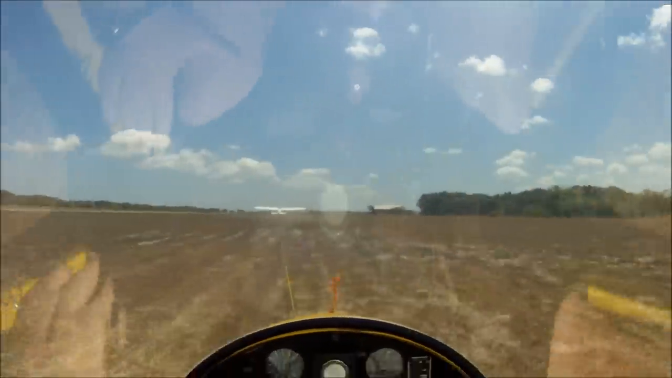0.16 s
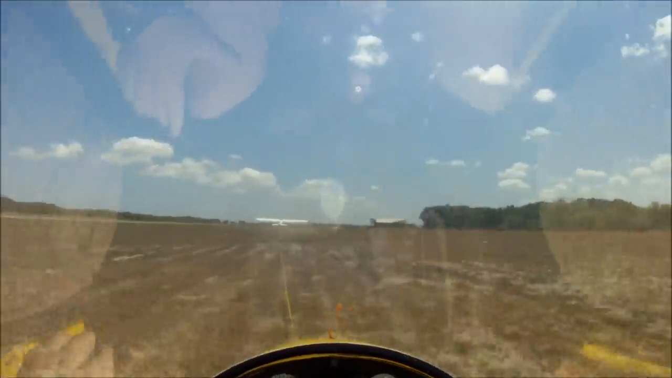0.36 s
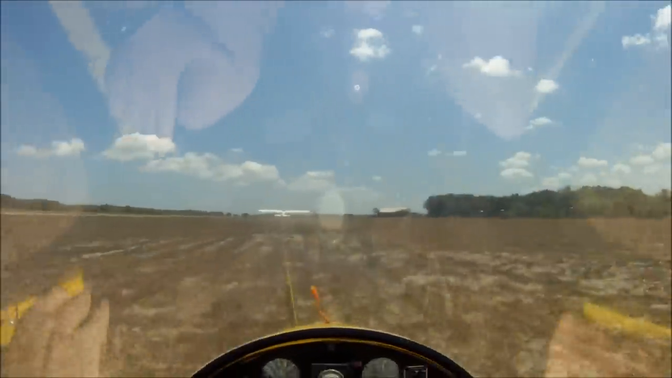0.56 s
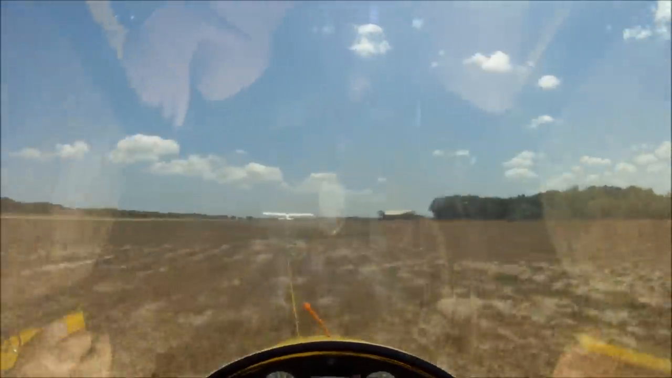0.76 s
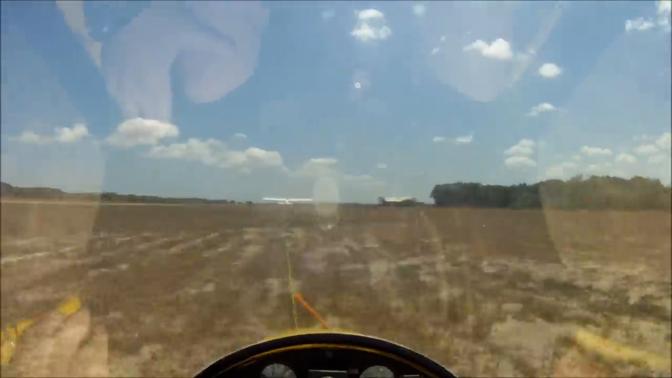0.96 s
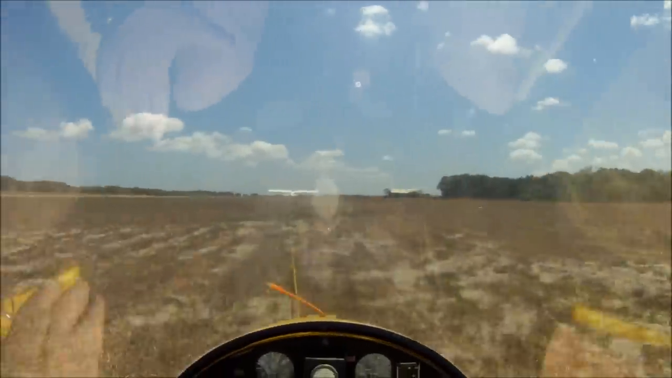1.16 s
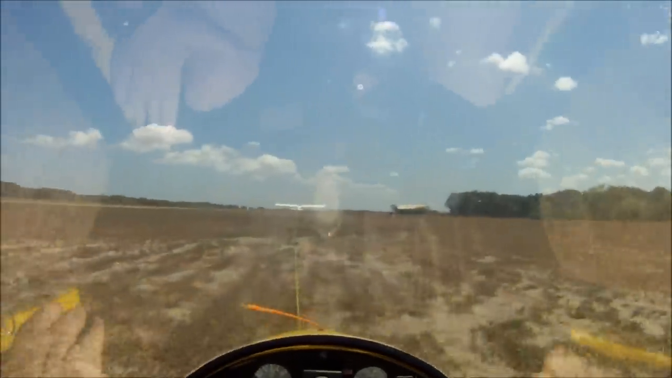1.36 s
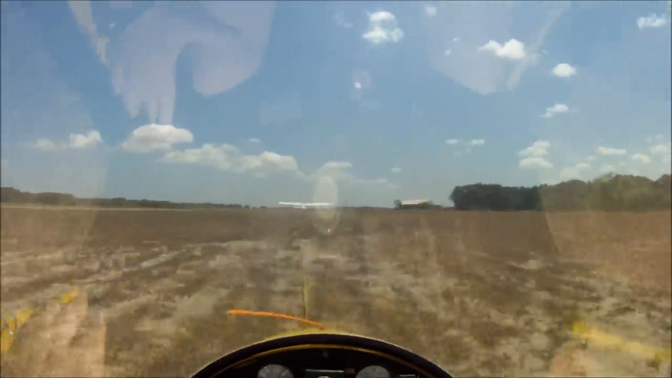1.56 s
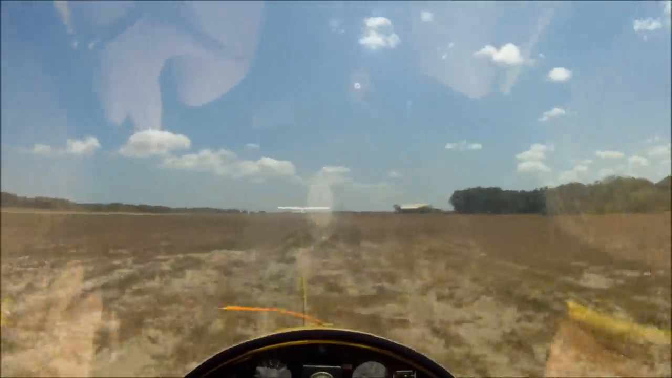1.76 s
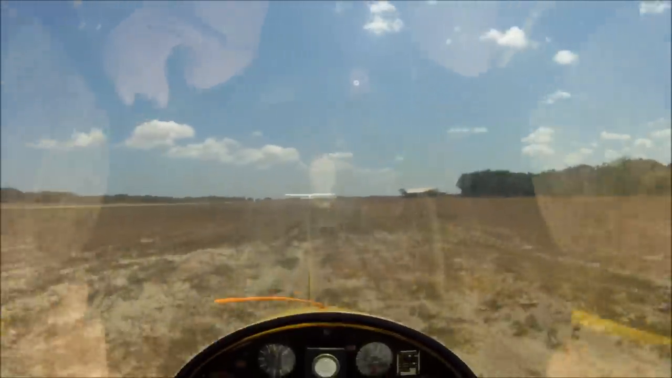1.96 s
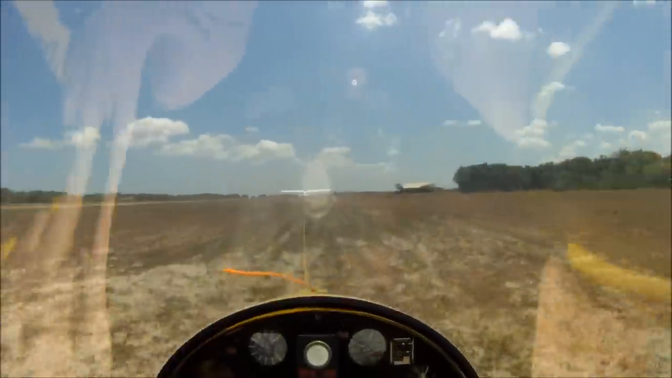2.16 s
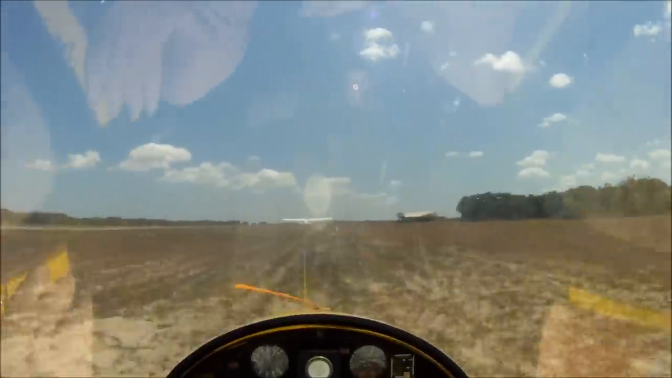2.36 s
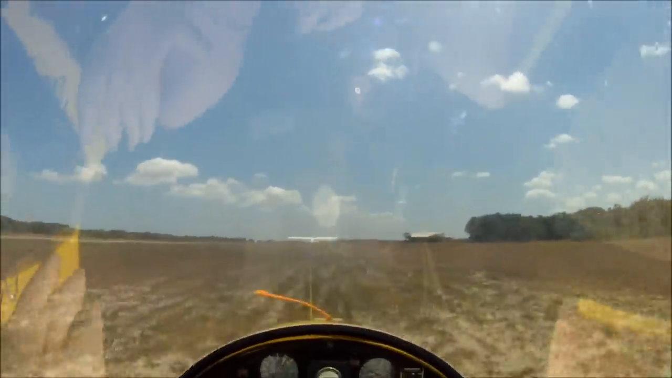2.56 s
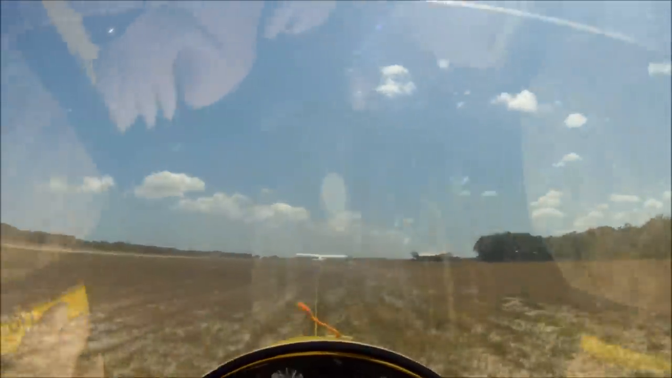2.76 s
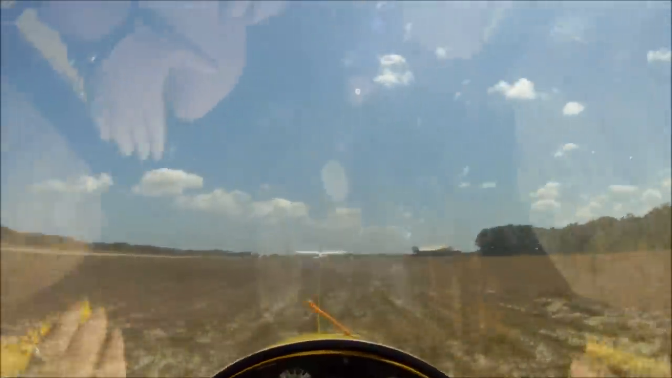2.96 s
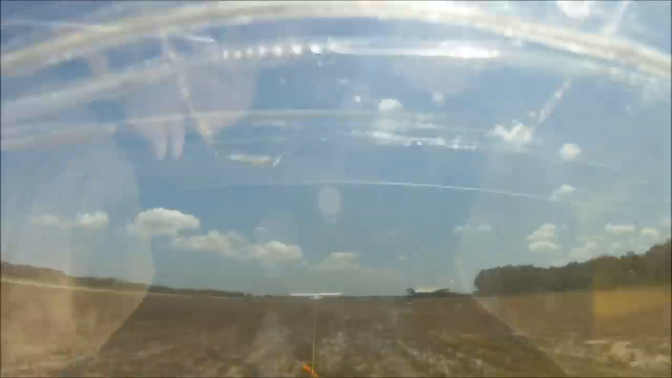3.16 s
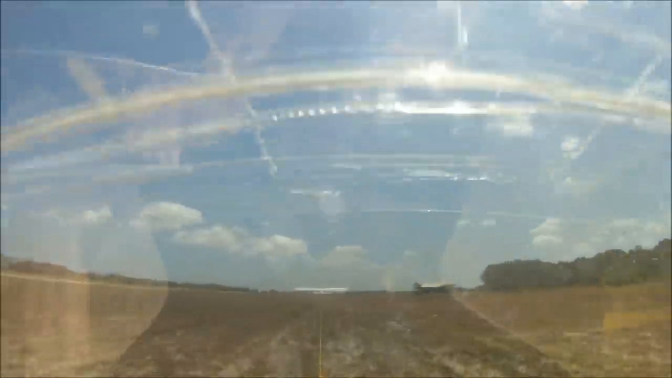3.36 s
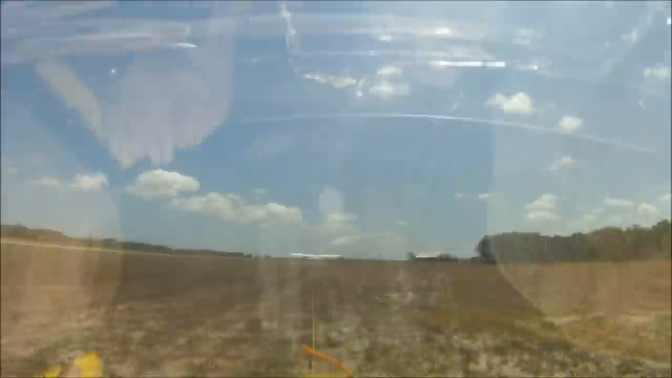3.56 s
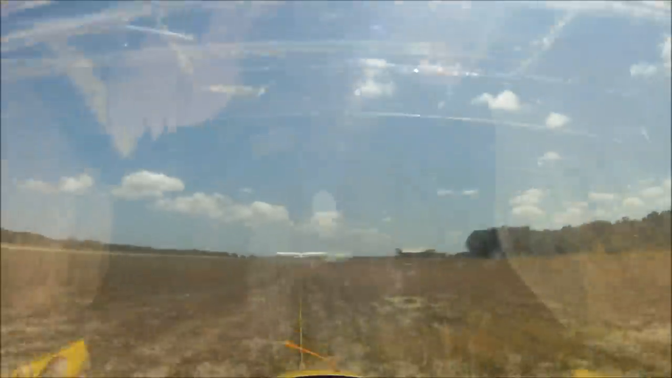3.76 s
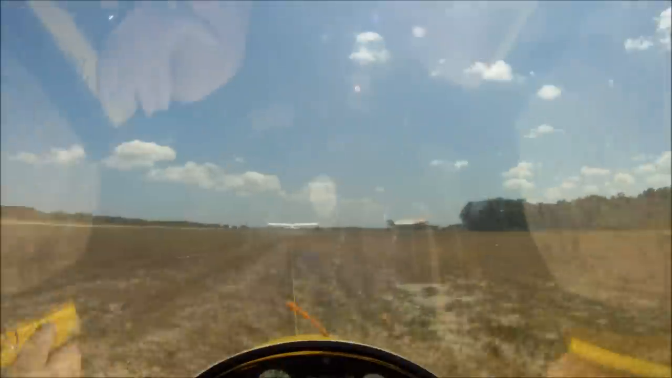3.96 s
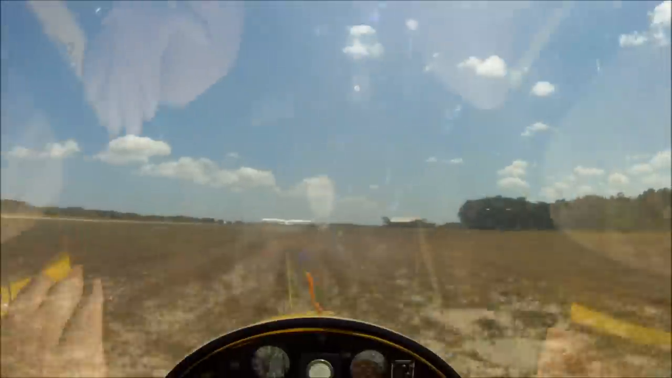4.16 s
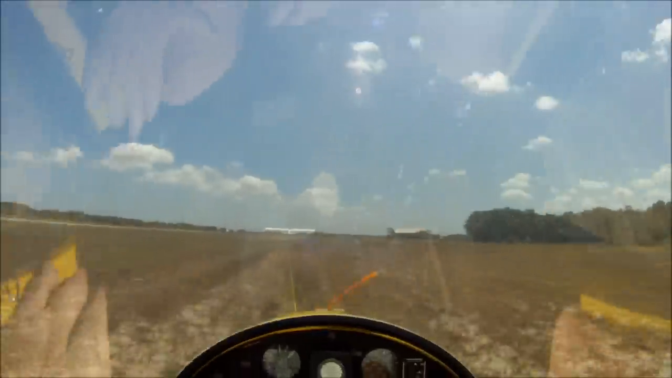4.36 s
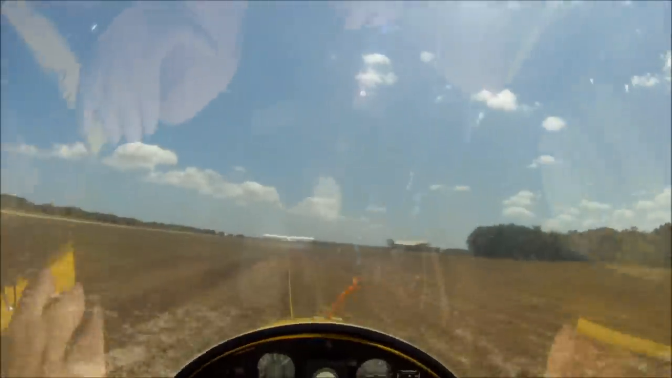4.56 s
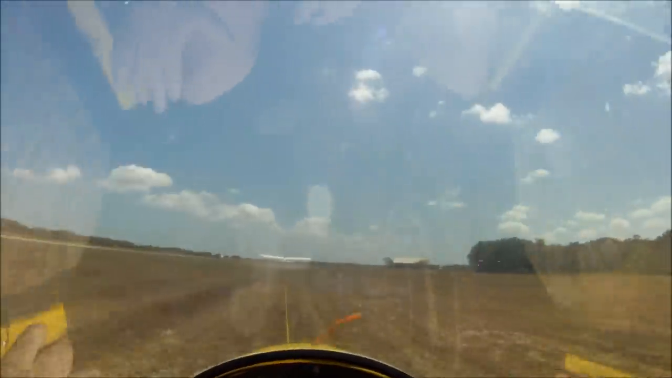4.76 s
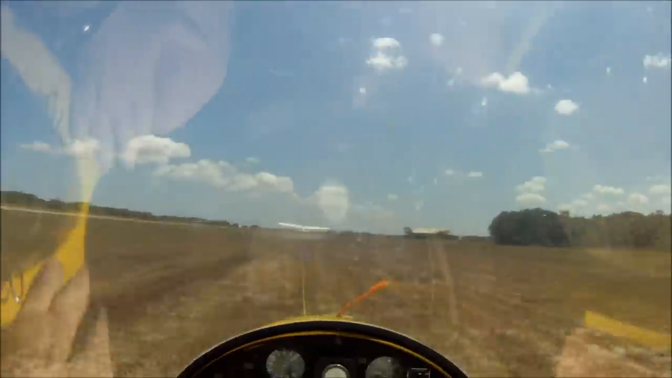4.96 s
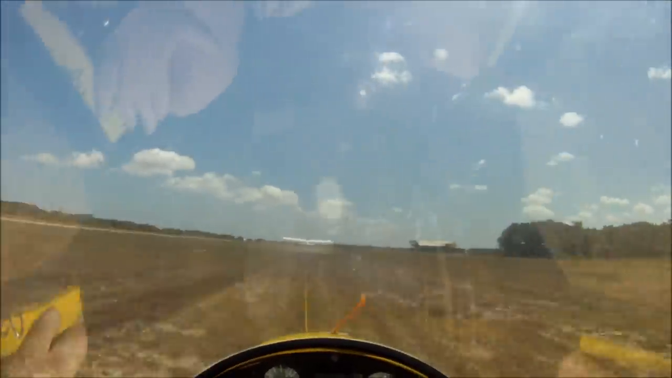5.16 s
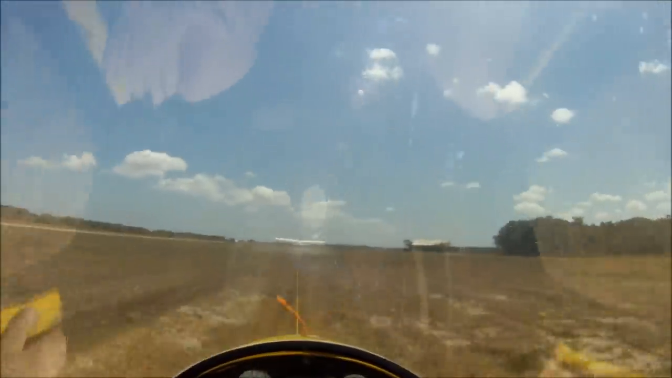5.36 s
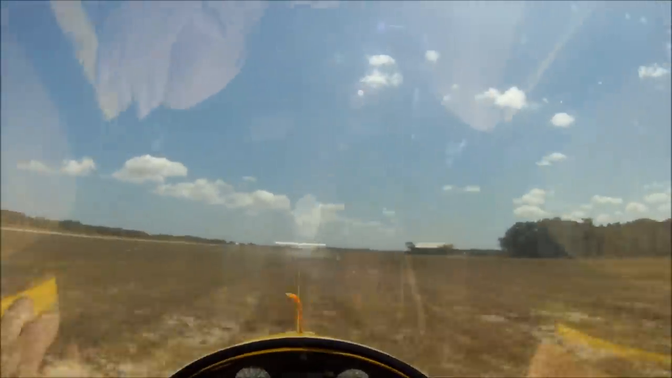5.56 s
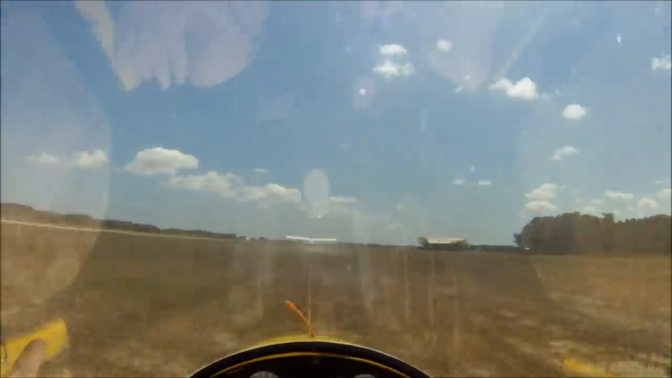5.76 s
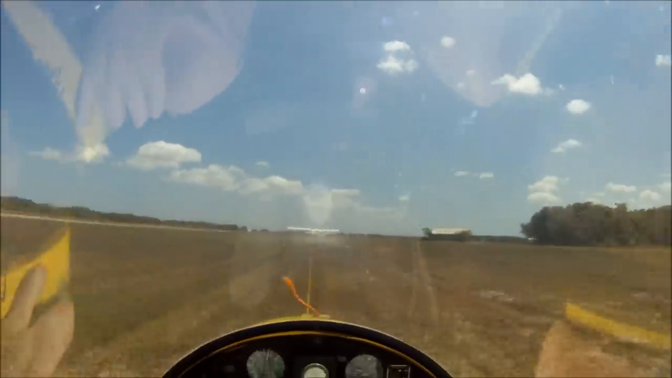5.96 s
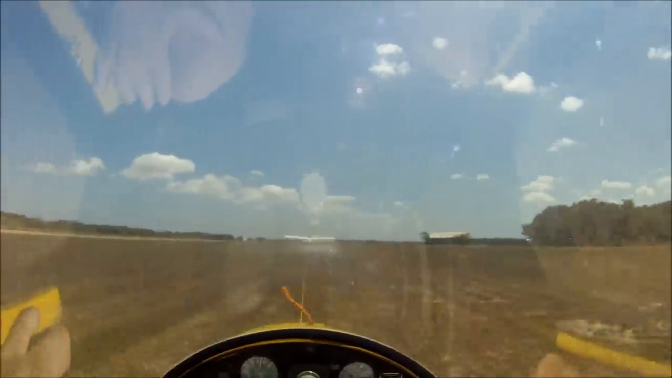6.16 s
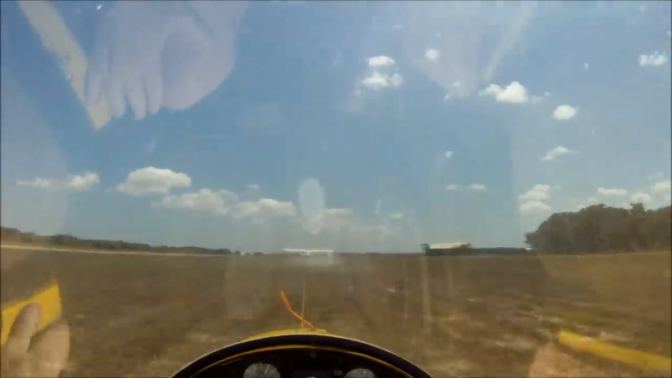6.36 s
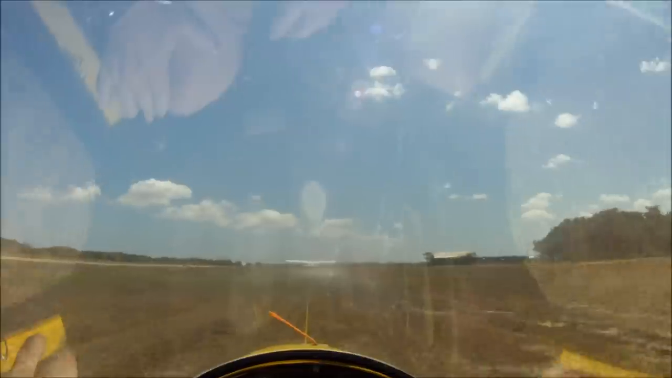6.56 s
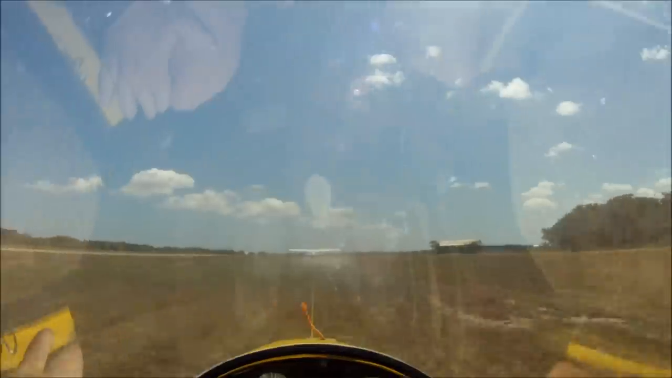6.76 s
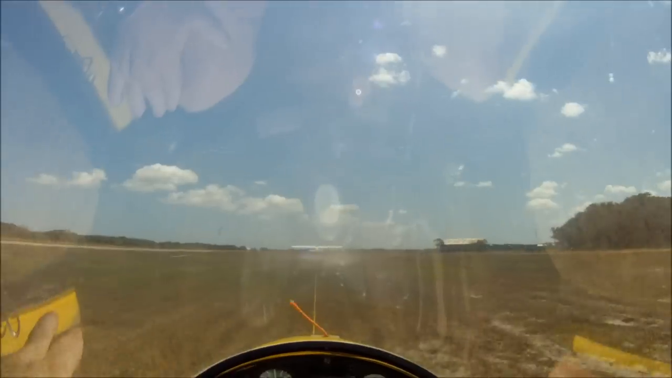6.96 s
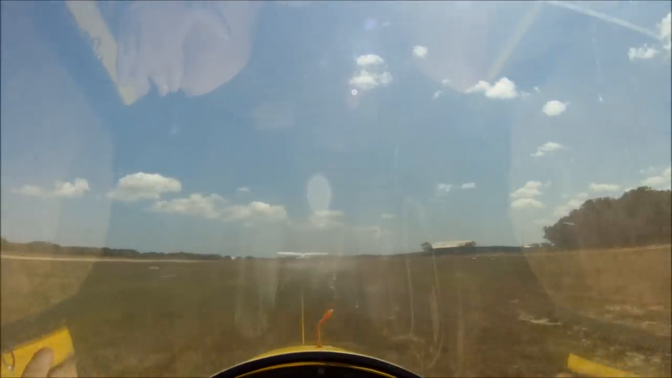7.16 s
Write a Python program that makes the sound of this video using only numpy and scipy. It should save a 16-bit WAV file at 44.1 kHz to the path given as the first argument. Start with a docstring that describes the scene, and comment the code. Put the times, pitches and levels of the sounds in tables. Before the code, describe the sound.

A glider cockpit during a ground tow over rough grass, heard through a cheap microphone mounted inside. A low, uneven wheel rumble and hollow fuselage boom run throughout, with a faint gusty air rush slowly growing. At 0.24 seconds a sharp, buzzing knock overloads the microphone, with a heavy thump. Small gritty rattles and scattered dry ticks follow. From about 1.75 seconds the bumps get rougher; plastic rattling comes in dense bursts, harshest and most grating between 2.9 and 3.5. At 3.9 a second loud, distorted knock hits with a deeper push, then a brief dip around 4.0. Thumps and rattles continue to about 4.8, followed by a calmer stretch of rumble and ticks. More bumps rattle at 5.97 and 6.4-6.8 as the boom and air keep building until the end. The tone is narrow and muffled, with a thin fizzy treble.

```python
"""A rumbling wheel, a hollow boom and rushing air: a glider under tow on rough grass, heard in the cockpit.
Shaped noise makes these three; decaying sines add low thumps, from the wheel in ruts and under the mount's
knocks. Bumps shake gritty rattle from the plastic microphone housing as dense tiny impacts; loose fittings tick
as scuffed noise pulses. The camera mount knocks as a buzz of sines, twice hard enough to overload the input. A
cheap recorder narrows the band and holds each slow sample, adding a thin, fizzy treble."""
import sys
import numpy as np
from scipy import signal
from scipy.fft import rfft, irfft
from scipy.io import wavfile

SR = 44100
rng = np.random.default_rng(int(sys.argv[2]) if len(sys.argv) > 2 else 0)


def file_out(sig):
    """Save sig as 16-bit WAV at sys.argv[1]."""
    # one column per channel
    cols = np.atleast_2d(sig).T
    # limit, then scale
    lim = np.clip(cols, -1, 1)
    pcm = np.round(lim * 32767).astype(np.int16)
    wavfile.write(sys.argv[1], SR, pcm)


N = 321822
TAPS = 4096
TIME_S = np.arange(N) / SR
BIN_HZ = np.fft.rfftfreq(TAPS, 1 / SR)
CLOCK_HZ, EDGE_HZ = 12000, 15450  # recorder sample clock, top of its output band

# Wheel and fuselage level laws, before trim:
# (start level [dB], growth with speed [dB/s], share of shaking [dB/dB], random swell rms [dB])
RUMBLE_LAW = (-33, 0.63, 0.37, .5)
BOOM_LAW = (-38, 0.6946, .2, 0.77)
# Brief swells and dips in rumble and boom: (time [s], half length [s], rumble change [dB], boom change [dB])
SWELLS = [(.04, 0.027, 4.5, 7.5), (1.93, .1, -2, 3.5), (2.45, .15, 3, -0.5), (4.095, .04, 0, 4),
          (4.5, .12, 0.5, 2.5), (4.98, .03, -5, 5), (6.094, 0.016, 0, 9), (6.33, 0.038, 0, 8),
          (6.67, 0.072, 1.5, 4), (7.18, 0.067, 3, 0)]
# Brief lulls in the din, each layer taking its share: (time [s], half length [s], full depth [dB])
LULLS = [(0.303, .04, 4.5), (0.716, 0.027, 5), (0.857, 0.033, 2.5), (2.666, 0.019, 7.5), (2.92, 0.029, 3),
         (4.006, 0.027, 17), (4.702, 0.028, 5), (4.927, .04, 4.5), (6.018, 0.016, 11), (6.462, .025, 6.5)]
# Rolling wheel spectrum: (frequency [Hz], relative density [dB per Hz])
RUMBLE_SPECTRUM = [(10, -10.5), (22, 4.5), (32, 0), (46, -1), (62, -4), (100, -7.5), (125, -7),
                   (150, -21.5), (250, -20.5), (400, -30.5), (900, -53)]
# Low thumps, from the wheel dropping into ruts and under the mount knocks: (time [s], level [dB], pitch [Hz],
# swell time [s])
THUMPS = [(0.241, -21, 50, 0.0072), (0.2439, -5.5, 147, 0.0014), (1.599, -19.5, 41, 0.0097),
          (1.955, -19, 70, 0.0069), (2.054, -21.5, 65, 0.009), (3.186, -18, 79.4, 0.0063),
          (3.25, -17.5, 59, 0.01), (3.898, -11, 107, 0.0047), (3.968, -14.5, 42.3, 0.009),
          (4.307, -13, 42, .012), (4.375, -23, 30, 0.031), (4.721, -18.5, 33, 0.024),
          (4.73, -17.5, 84, 0.01), (5.8, -23, 33, 0.016), (6.19, -19.5, 60, 0.0067),
          (6.656, -21, 121, 0.017)]
# Fuselage air modes: (frequency [Hz], width [Hz], relative level [dB])
CABIN_MODES = [(134.4, 15.5, -3.5), (178.4, 22, 2), (200.3, 11, 1.5), (227, 18.5, -1.5),
               (289.4, 20.6, -9.5)]
# Airflow spectrum: (frequency [Hz], relative density [dB per Hz])
AIR_SPECTRUM = [(100, 1.5), (280, -10.5), (450, -8), (800, -9), (1500, -16), (2200, -6.5), (3000, -18.5),
                (4500, -26), (6000, -42)]
# Cockpit shaking between bumps: (time [s], rattle drive [dB])
SHAKE = [(0, -48), (.45, -43), (.89, -44), (1.05, -41), (1.45, -42), (1.62, -38.5), (2, -34.5),
         (2.45, -36.5), (2.62, -38.5), (3.08, -35), (3.4, -28.5), (3.68, -40), (4.2, -36), (5.1, -42.5),
         (5.45, -42.5), (5.63, -35.5), (6.15, -42), (6.68, -38.5), (7.04, -44), (7.3, -36.5)]
USUAL_SHAKE_DB = -40.5  # on average turf
# Bumps that set off rattle bursts: (time [s], drive level [dB], fade time [s], hard/soft ratio [dB])
JOLTS = [(.036, -30, 0.018, -25), (0.368, -29.5, 0.02, -25), (.565, -33, 0.035, -25),
         (.615, -30.5, 0.039, -14), (.78, -27, 0.015, -27), (1.006, -37, 0.071, -19),
         (1.109, -35, 0.088, -15), (1.764, -22, 0.016, -5.5), (1.821, -30, 0.038, -10),
         (1.953, -20.5, 0.02, -12), (1.993, -25, 0.019, -6), (2.206, -25, .008, -5),
         (2.33, -26, 0.014, -20), (2.358, -27, 0.059, -17), (2.41, -27.5, 0.1, -17),
         (2.688, -35, 0.048, -25), (2.952, -18, 0.022, -8), (3.058, -24, 0.016, -20),
         (3.188, -21.5, 0.039, -7), (3.308, -19.5, 0.027, -7), (3.374, -24.5, 0.018, 1),
         (3.436, -25.5, 0.019, 2), (3.703, -31.5, 0.027, -1.5), (4.042, -31, .01, -13),
         (4.077, -22.5, 0.036, -6), (4.374, -27, 0.1, -20), (4.425, -26.5, 0.043, -3.5),
         (4.527, -32, 0.034, -23), (4.574, -27, .026, -28.5), (4.618, -20, 0.0099, -27),
         (4.746, -28, .11, -17), (4.791, -23, 0.0099, -19), (5.272, -26.5, .037, -28),
         (5.433, -29, 0.015, -28), (5.971, -25, .028, -21), (6.381, -32, 0.048, -20),
         (6.485, -25, 0.041, -8), (6.538, -30.5, 0.019, -21), (6.677, -24.5, 0.033, -22),
         (6.734, -30.5, 0.093, -15)]
# Steady shaking: drive at which half grates [dB], growth of hard/soft ratio [dB/dB]
GRATE_FROM_DB, GRATE_PER_DB = -17, .9
# Housing resonances: (frequency [Hz], width [Hz], relative level [dB])
HOUSING_MODES = [(463, 30, -2.5), (617, 28, -4.5), (854, 81, -11), (1203, 187, -7), (1743, 240, -7),
                 (2097, 190, 1), (2297, 214, -0.5), (2730, 25, -15.5), (3302, 78, -10), (3705, 205, -11),
                 (4800, 120, -21)]
# Housing transmission between resonances: (frequency [Hz], relative gain [dB])
WALL_GAIN = [(60, -9), (300, -6), (900, -13.5), (1450, -19), (2600, -14.5), (3500, -20), (4200, -27),
             (5300, -21), (6000, -29.5)]
# Housing weighting under hard, grating contact: (frequency [Hz], relative gain [dB])
GRATE_GAIN = [(150, 1), (600, -15), (1700, 4), (2200, -4), (2800, 13.5), (3800, 9), (5500, 6.5)]
# Loudest ticks of loose fittings: (time [s], level before tick gain [dB])
TICKS = [(.043, -32.5), (.111, -33), (.12, -39), (.298, -40), (.429, -35.5), (.507, -38.5), (.942, -38),
         (1.121, -29.5), (1.188, -28.5), (1.294, -36), (1.372, -33), (1.535, -35), (1.545, -32.5),
         (1.604, -34.5), (1.758, -26.5), (1.904, -33), (2.092, -31), (2.21, -33), (2.278, -35), (2.36, -31),
         (2.703, -37), (2.921, -38), (3.127, -31.5), (3.561, -32.5), (3.612, -29), (3.621, -32),
         (3.706, -35), (3.774, -34.5), (4.146, -32), (4.646, -31), (4.777, -33), (4.858, -29),
         (4.867, -28.5), (4.919, -31.5), (5.222, -34), (5.523, -37), (5.878, -29.5), (5.929, -33.5),
         (6.011, -32), (6.418, -31.5), (7.175, -35.5)]
# Tick spectrum: (frequency [Hz], relative density [dB per Hz])
TICK_SPECTRUM = [(200, -17), (1400, -1), (2200, 9), (2800, -2), (3400, 6.5), (5200, 7), (6000, -2)]
# Faint ticks weaken as the wings take the weight
PATTER_START_DB, PATTER_DB_PER_S = -53, -1.5
# Mount knocks and rebounds: (time [s], level [dB], length [s], push/buzz ratio [dB])
KNOCKS = [(0.2411, 6.5, 0.0044, -15), (.258, -33, 0.0033, -4), (3.895, 8, 0.0047, 3),
          (3.905, -20, 0.0032, -10), (3.968, -25.5, 0.0028, -8)]
# Mount modes: (frequency [Hz], relative level [dB])
MOUNT_MODES = [(340, -11), (620, -10), (800, -10), (1020, -7), (1270, -1), (1520, -6.5), (1770, 1),
               (2050, 2.5), (2300, -11), (2600, 1.5), (2900, -35), (3200, -4.5), (3620, -1.5), (4200, -15),
               (4850, -8.5)]


def amp(db):
    """Converts decibels to amplitude gain."""
    return 10 ** (np.asarray(db) / 20)


def evened(x):
    """Scales a signal to unit rms."""
    return x / np.sqrt(np.mean(x ** 2) + 1e-20)


def slope(points):
    """Gain per bin, interpolated in dB on a log-frequency axis."""
    hz, db = np.transpose(points)
    return amp(np.interp(np.log(BIN_HZ + 1), np.log(hz), db))


def peaks(modes):
    """Gain per bin of resonances summed in power."""
    power = 0
    for hz, width_hz, db in modes:
        gain = amp(db) / (1 + ((BIN_HZ - hz) / width_hz) ** 2 * 2)
        power = power + gain ** 2
    return np.sqrt(power)


def ring(gain):
    """Minimum-phase, unit-energy impulse response of a gain curve."""
    cepstrum = irfft(np.log(np.maximum(gain / gain.max(), 1e-5)))
    # folding the cepstrum onto positive time makes the response causal
    cepstrum[1:TAPS // 2] *= 2
    cepstrum[TAPS // 2 + 1:] = 0
    response = irfft(np.exp(rfft(cepstrum)))
    return response / np.linalg.norm(response)


def through(force, gain):
    """Filters a force through a body's response."""
    return signal.oaconvolve(force, ring(gain))[:N]


def flutter(rate_hz):
    """Smooth unit-rms random curve, low-passed near the given rate."""
    hz = np.fft.rfftfreq(N, 1 / SR)
    spectrum = rfft(rng.standard_normal(N))
    return evened(irfft(spectrum / (1 + (hz / rate_hz) ** 4), N))


def add(mix, start_s, sound):
    """Adds a sound into the mix in place."""
    part = mix[max(round(start_s * SR), 0):][:len(sound)]
    part += sound[:len(part)]


def bells(times_s, half_lengths_s, heights_db):
    """Sum of bell-shaped level changes, in dB over time."""
    total_db = 0
    for s, half_s, db in zip(times_s, half_lengths_s, heights_db):
        total_db = total_db + db * np.exp(-((TIME_S - s) / half_s) ** 2)
    return total_db


def rolling(law, shake_db, swell_hz=7):
    """Level in dB: a steady climb for speed, a share of the shaking and a random swell."""
    start_db, db_per_s, share, swell_db = law
    shaking_db = share * (shake_db - USUAL_SHAKE_DB)
    return start_db + db_per_s * TIME_S + shaking_db + swell_db * flutter(swell_hz)


def wheel(level_db, trim_db=-1):
    """Uneven turf shakes the airframe as low noise; heavy decaying sines add low thumps, from ruts and under
    the knocks."""
    noise = evened(through(rng.standard_normal(N), slope(RUMBLE_SPECTRUM)))
    out = amp(level_db + trim_db) * noise
    t = TIME_S[:SR // 3]
    for s, db, hz, swell_s in THUMPS:
        envelope = t / swell_s * np.exp(1 - t / swell_s)
        add(out, s, amp(db) * envelope * np.sin(2 * np.pi * hz * t))
    return out


def fuselage(level_db, trim_db=-1):
    """Noise rings the air modes of the hollow shell as a boom."""
    boom = evened(through(rng.standard_normal(N), peaks(CABIN_MODES)))
    return amp(level_db + trim_db) * boom


def airflow(start_db=-52, end_db=-44, gust_db=3.5, gust_hz=7.2):
    """Air rushing over the canopy: gusty shaped noise, growing with speed."""
    climb_db = (end_db - start_db) * TIME_S / TIME_S[-1]
    level_db = start_db + climb_db + gust_db * flutter(gust_hz)
    return amp(level_db) * evened(through(rng.standard_normal(N), slope(AIR_SPECTRUM)))


def grit(level_db, grains_per_s=3500, spread_db=0.5, flutter_db=1.14, flutter_hz=45):
    """Dense train of tiny impacts, random in time, sign and size, with flickering strength."""
    sizes = amp(spread_db * np.minimum(rng.exponential(1, N), 3)) * rng.choice([-1, 1], N)
    hits = rng.random(N) < grains_per_s / SR
    return amp(level_db) * evened(sizes * hits * amp(flutter_db * flutter(flutter_hz)))


def rattle(housing, shake_db, uneven_db=1.5, uneven_hz=22, grate_db=2, rise_s=0.0023):
    """Tiny impacts ring the housing; bumps add dying bursts, and hard contact grates."""
    power = amp(shake_db + uneven_db * flutter(uneven_hz)) ** 2
    hardness = (power / amp(GRATE_FROM_DB) ** 2) ** GRATE_PER_DB  # hard/soft power ratio
    soft_power = power / (1 + hardness)
    hard_power = power * hardness / (1 + hardness)
    t = TIME_S[:SR // 2]
    for s, db, fade_s, hard_db in JOLTS:
        envelope = np.minimum(t / rise_s, 1) * np.exp(-t / max(fade_s, .004))
        burst_power = (amp(db) * envelope) ** 2
        add(soft_power, s, burst_power / (1 + amp(hard_db) ** 2))
        # the hard part is not reduced in turn: it adds to the burst
        add(hard_power, s, burst_power * amp(hard_db) ** 2)
    grating = grit(grate_db, grains_per_s=1500, spread_db=2.5) * np.sqrt(hard_power)
    rattling = grit(0) * np.sqrt(soft_power)
    return through(rattling, housing) + through(grating, housing * slope(GRATE_GAIN))


def ticks(shake_db, gain_db=19, faint_per_s=25, chatter_db=-18, shake_share=0.62):
    """Loose fittings scuff briefly, then chatter; faint random ticks get louder with shaking."""
    t, scuff_s = TIME_S[:SR // 40], .0005
    scuffing = t / scuff_s * np.exp(1 - t / scuff_s)
    shape = scuffing + amp(chatter_db) * np.exp(-t / 0.038)
    starts = 1. * (rng.random(N) < faint_per_s / SR)
    touches = signal.oaconvolve(starts, shape)[:N]
    shaking_db = shake_share * (shake_db - USUAL_SHAKE_DB)
    patter_db = PATTER_START_DB + PATTER_DB_PER_S * TIME_S + shaking_db
    force = amp(patter_db) * evened(touches * rng.standard_normal(N))
    unit_shape = shape / np.linalg.norm(shape)
    scuffs = np.sign(rng.standard_normal((len(TICKS), len(t))))
    for (s, db), scuff in zip(TICKS, scuffs):
        add(force, s - scuff_s, amp(db + gain_db) * unit_shape * scuff)  # peaks at s
    low_pass = 1 / np.hypot(1, (BIN_HZ / (CLOCK_HZ / 2)) ** 10)
    return through(force, slope(TICK_SPECTRUM) * low_pass)


def knocks(push_hz=170, push_s=0.004, tail_db=-21, tail_s=0.0042, lag_rad=.45):
    """Each blow makes the mount modes buzz for milliseconds, over a dull push."""
    out, t = np.zeros(N), TIME_S[:TAPS]
    buzz = np.zeros(TAPS)
    for k, (hz, db) in enumerate(MOUNT_MODES):
        # higher modes lag, spreading the blow into a buzz
        buzz += amp(db) * np.sin(2 * np.pi * hz * t - lag_rad * k ** 2)
    buzz = evened(buzz)
    push = -np.sin(2 * np.pi * push_hz * t) * np.exp(-(t / push_s) ** 2)
    for s, db, length_s, push_db in KNOCKS:
        envelope = np.exp(-(t / length_s) ** 4) + amp(tail_db) * np.exp(-t / tail_s)
        add(out, s, amp(db) * (buzz * envelope + amp(push_db) * push))
    return out


def scene(rumble_lull=0.63, boom_lull=0.99, air_lull=0.4):
    """Sums all layers at the microphone; the lull settings are shares of the full depth."""
    shake_db = np.interp(TIME_S, *np.transpose(SHAKE))
    lull_db = bells(*np.transpose(LULLS))
    s, half_s, rumble_change_db, boom_change_db = np.transpose(SWELLS)
    rumble_db = rolling(RUMBLE_LAW, shake_db) + bells(s, half_s, rumble_change_db) - rumble_lull * lull_db
    boom_db = rolling(BOOM_LAW, shake_db) + bells(s, half_s, boom_change_db) - boom_lull * lull_db
    air = airflow() * amp(-air_lull * lull_db)
    housing = np.hypot(peaks(HOUSING_MODES), slope(WALL_GAIN))
    lulled_db = shake_db - lull_db
    shaken = rattle(housing, lulled_db) + ticks(lulled_db) + knocks()
    return (wheel(rumble_db) + fuselage(boom_db) + air + shaken)[None]


def record(dry, band_hz=5600, gain_db=-0.5, overload=0.84):
    """Cheap recorder: clipping input, narrow band, each slow sample held until the next."""
    hz = np.fft.rfftfreq(N, 1 / SR)
    driven = np.clip(amp(gain_db) * dry, -overload, overload)
    narrow = irfft(rfft(driven) / np.sqrt(1 + (hz / band_hz) ** 40), N)
    # sampling mirrors the sound about the clock rate: a thin, fizzy treble
    mirrored = np.clip(narrow, -1, 1) * (1 + 2 * np.cos(2 * np.pi * CLOCK_HZ * TIME_S))
    held = irfft(rfft(mirrored) * np.sinc(hz / CLOCK_HZ), N)
    edge = signal.firwin(401, EDGE_HZ, window=("kaiser", 8), fs=SR)
    return signal.oaconvolve(held, edge[None], "same")


dry = scene()
out = record(dry)
file_out(out)
```